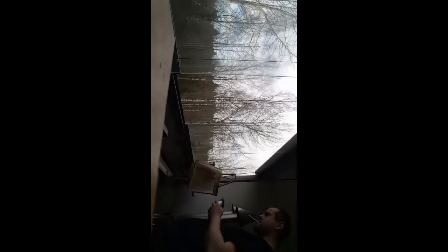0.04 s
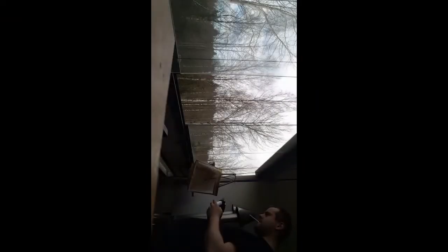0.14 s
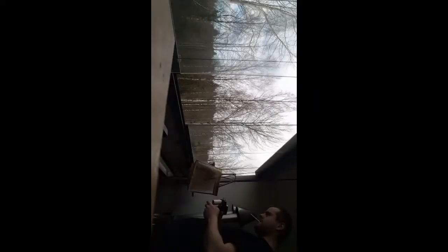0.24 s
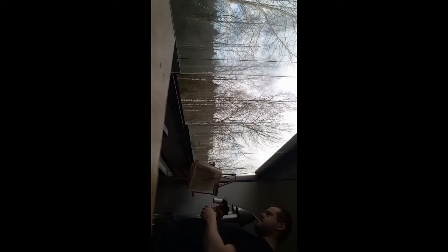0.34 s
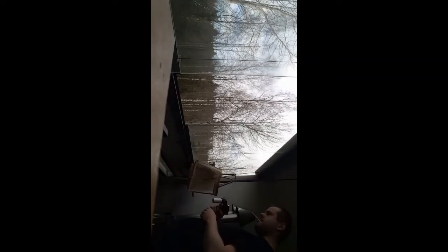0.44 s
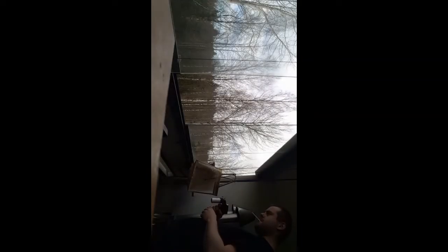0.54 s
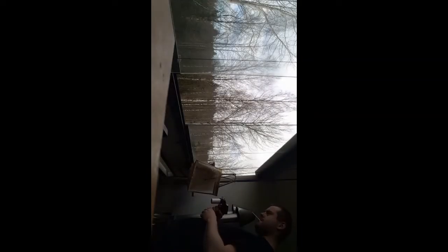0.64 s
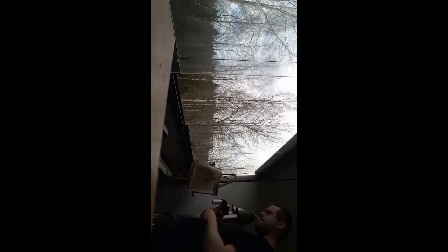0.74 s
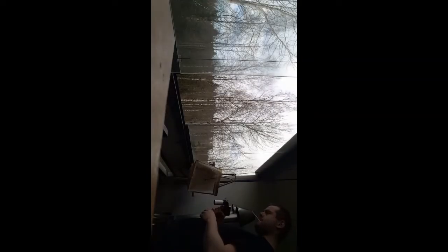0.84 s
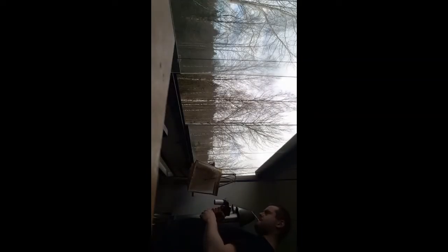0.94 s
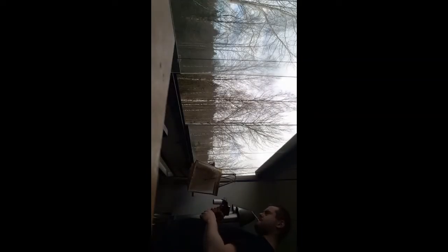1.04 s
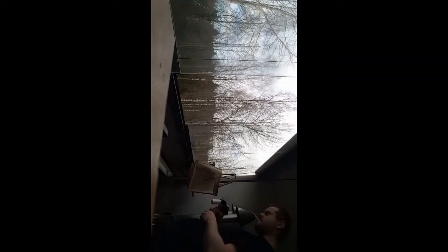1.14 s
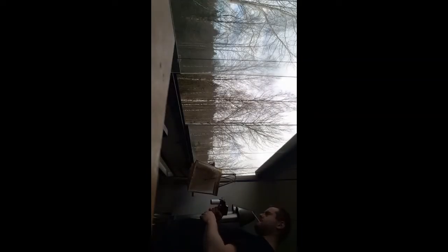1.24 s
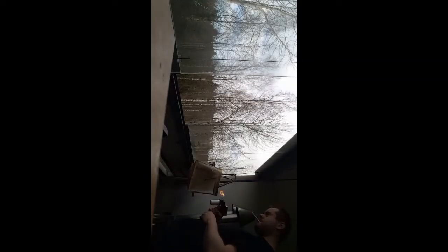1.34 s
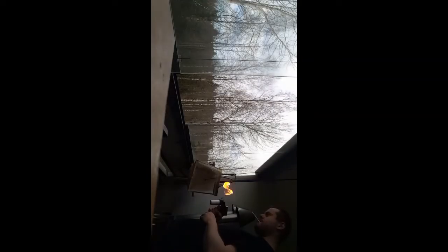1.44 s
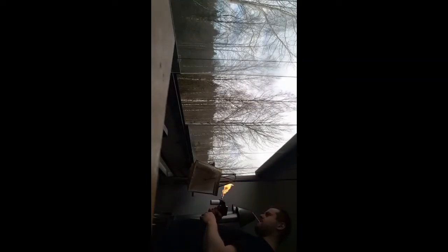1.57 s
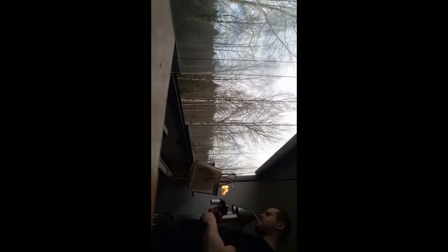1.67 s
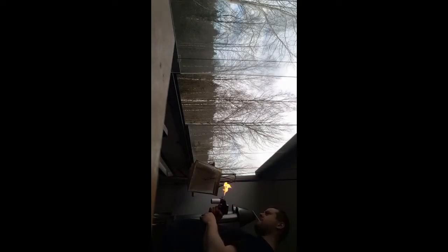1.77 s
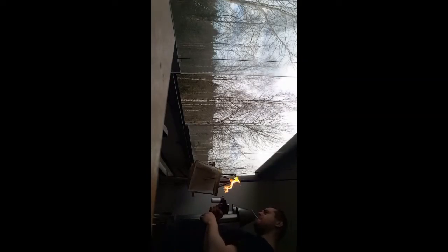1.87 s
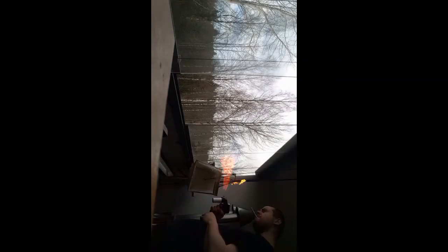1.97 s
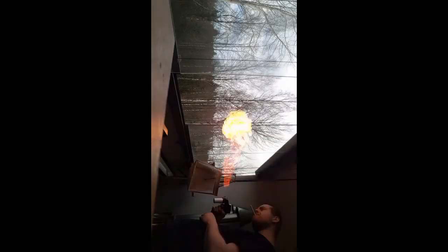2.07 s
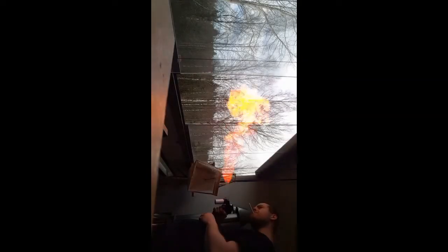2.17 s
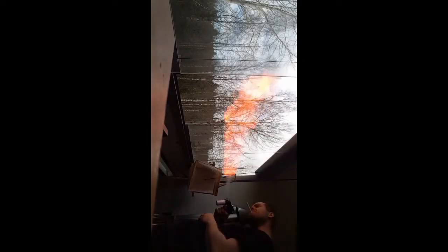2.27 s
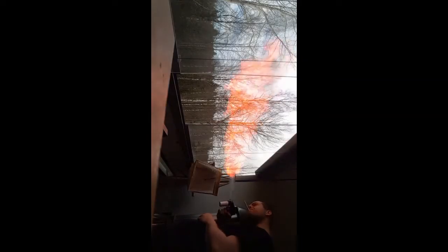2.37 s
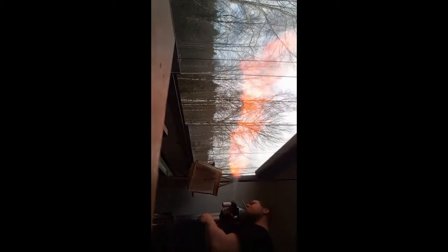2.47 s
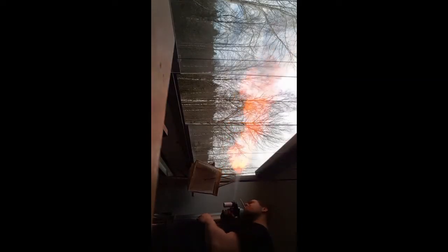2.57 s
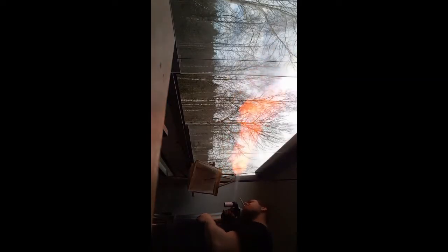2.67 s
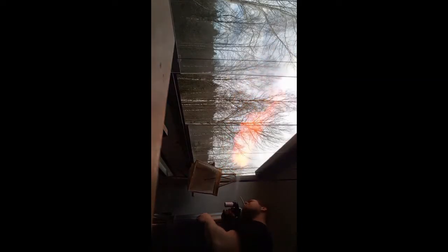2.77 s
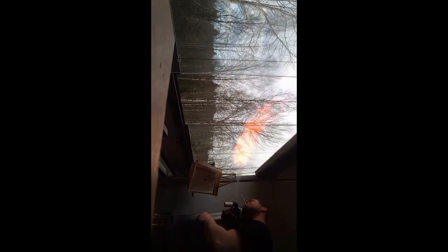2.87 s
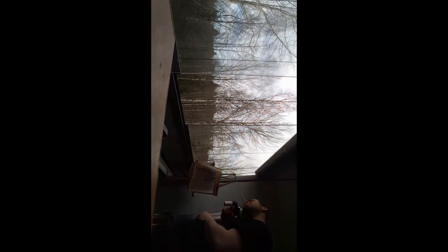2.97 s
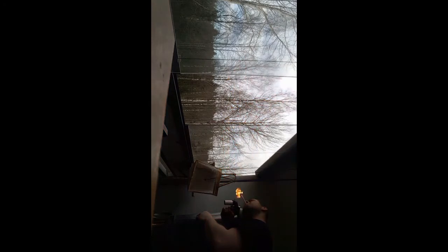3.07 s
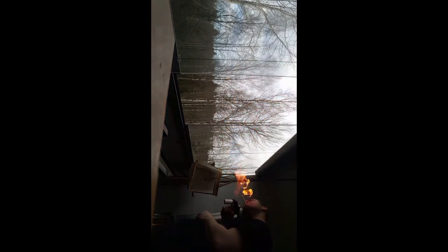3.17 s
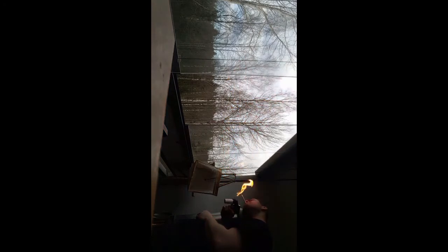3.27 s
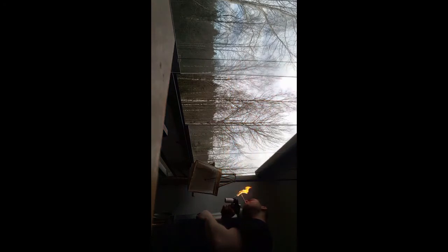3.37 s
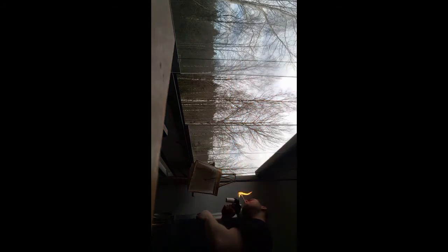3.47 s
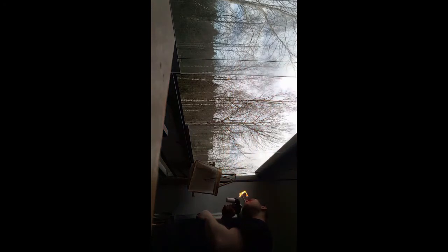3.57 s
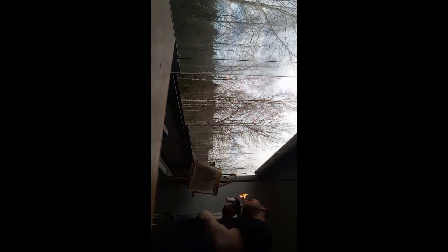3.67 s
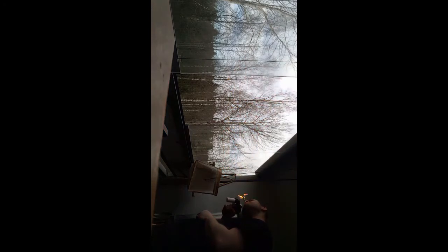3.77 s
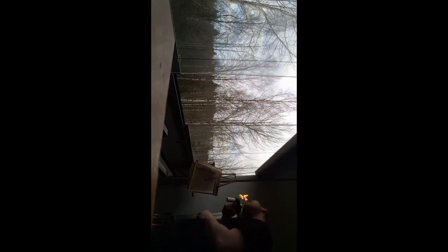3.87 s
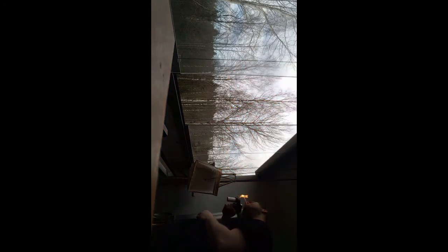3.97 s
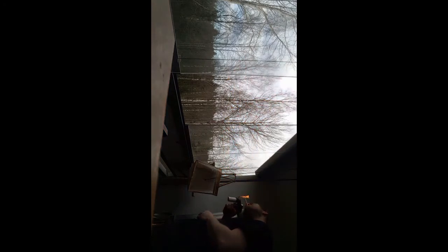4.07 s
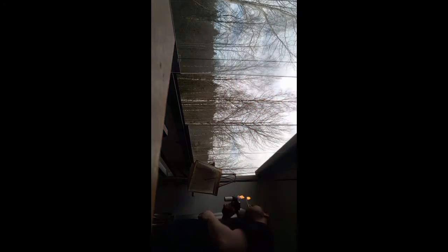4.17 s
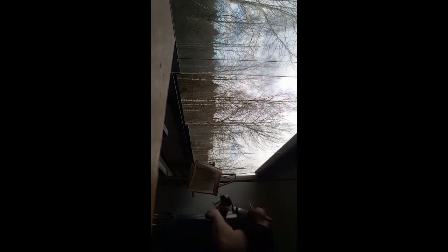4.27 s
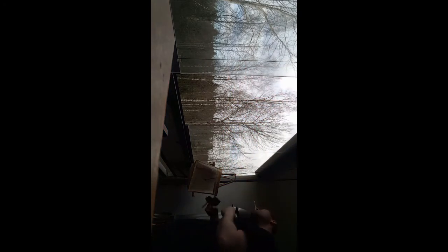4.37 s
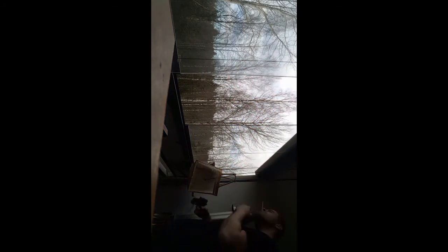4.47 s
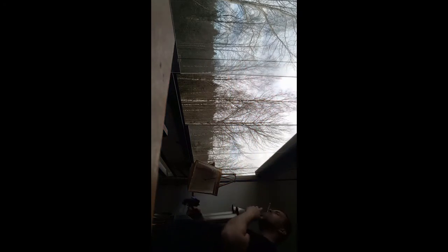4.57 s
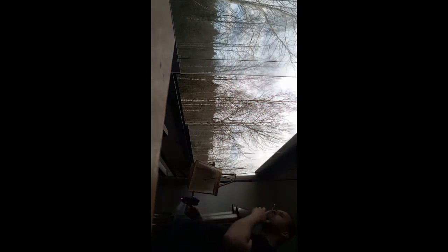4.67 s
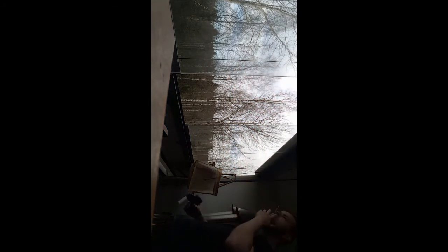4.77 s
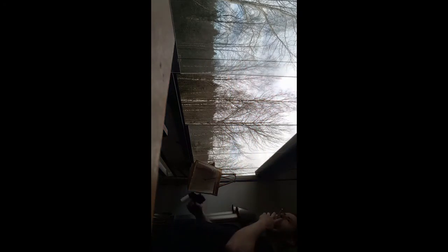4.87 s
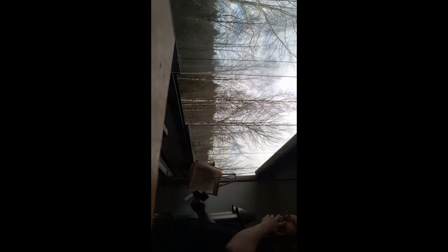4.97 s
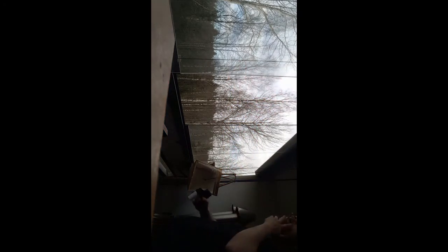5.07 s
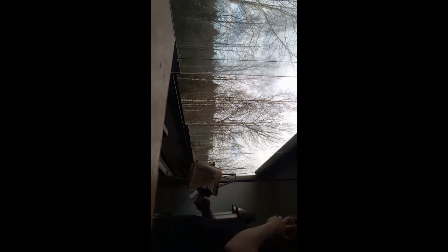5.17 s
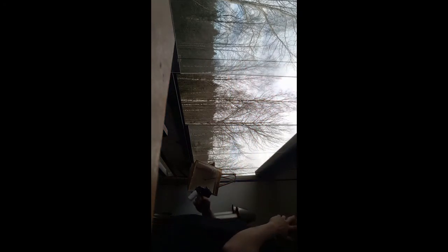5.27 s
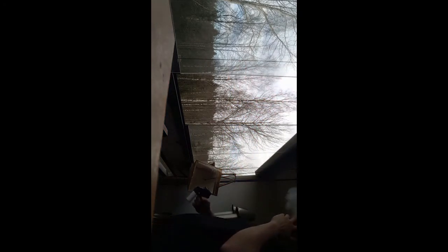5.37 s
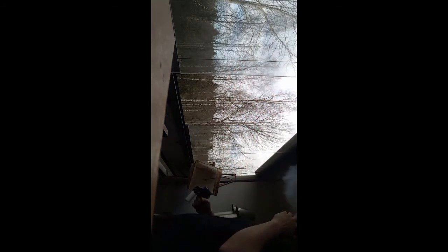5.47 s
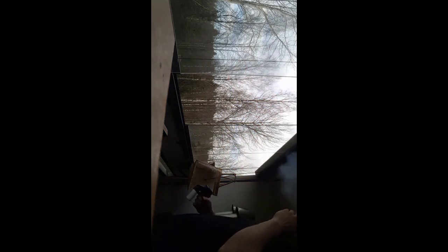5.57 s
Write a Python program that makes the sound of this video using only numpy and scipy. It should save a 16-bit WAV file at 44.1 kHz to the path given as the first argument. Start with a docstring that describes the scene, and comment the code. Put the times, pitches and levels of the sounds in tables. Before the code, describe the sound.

Close, overloading machine-gun pops of gas echo off a porch, followed by a crackling fireball roar, a late dry crack and a last hiss.

```python
"""Homemade gas torch on a covered porch

Close to the microphone, a torch sputters in a train of sharp pops: each is a short blast wave plus a puff of hissing
noise. It idles on a thin hiss, then sputters again and throws a fireball: roaring noise, booming billows, crackle.
A late flare-up, a dry crack and a last spurt of gas follow. Walls and roof echo the pops and colour the fire.
Faint rustles of clothing lie under it, and far tyres, as filtered noise, behind it all."""
import sys
import numpy as np
from scipy import signal
from scipy.fft import rfft, irfft
from scipy.io import wavfile
from scipy.ndimage import uniform_filter1d

SR = 44100
rng = np.random.default_rng(int(sys.argv[2]) if len(sys.argv) > 2 else 0)


def unload_audio(sound):
    """Save the sound as a 16-bit wav file, at the path given as the first command line argument."""
    columns = np.transpose(np.atleast_2d(sound))
    # keep every value between -1 and 1, then stretch to whole-number steps
    steps = np.round(np.clip(columns, -1, 1) * 32767)
    wavfile.write(sys.argv[1], SR, steps.astype(np.int16))


N = 247842
TIME = np.arange(N) / SR  # s
FREQS = np.maximum(np.fft.rfftfreq(N, 1 / SR), 1)  # Hz

# ignition pops: t/s, relative blast level/dB, burning builds/ms, burning stops/ms, treble snap level/dB
IGNITIONS = [(0.6224, 6.5, 2.85, 0.26, -11.5), (0.6656, 3.5, 2.78, 0.28, -9),
             (0.7069, 5.5, 0.71, 0.21, -13), (0.7511, 2, 2.16, 0.26, -8), (0.7961, -2, 3.0, 0.13, -10),
             (0.834, 3, 1.6, 0.19, -12.5), (0.8733, -8, 0.64, 0.26, -11.5), (0.9121, -5.5, 1, 0.24, -12),
             (0.9508, -7, 0.62, 0.23, -12), (0.9901, 0.5, 0.88, 0.23, -12.5),
             (1.0313, 1.5, 1.2, 0.17, -12.5), (1.0716, -1.5, 1.15, 0.37, -12),
             (1.1143, 0.0, 0.95, 0.15, -13.5), (1.1551, 3, 2.1, 0.2, -14.5), (1.195, 0, 0.58, 0.16, -10.5),
             (1.232, 0.5, 0.96, 0.24, -13), (1.2682, -4.5, 0.9, 0.4, -11.5), (1.3071, 1.0, 0.82, 0.16, -14),
             (1.3442, -1.5, 1.4, 0.29, -12.5), (1.3779, 1.5, 1, 0.19, -19), (1.4135, 2, 1.1, 0.3, -14),
             (1.4451, -7.5, 0.68, 0.34, -14.5), (1.4744, -2, 1.1, 0.32, -14.5),
             (2.1091, -10, 0.27, 0.2, -13.5), (2.1494, -5, 2.8, 0.41, -16),
             (2.1943, -5.5, 0.73, 0.44, -10.5), (2.2443, 1, 0.43, 0.13, -17), (2.292, 2, 0.49, 0.23, -13),
             (2.35, 1.5, 0.59, 0.23, -10.5), (2.4025, 6, 0.46, 0.17, -14.5), (2.4557, 1.5, 0.52, 0.22, -13),
             (2.5118, -1.5, 1.52, 0.29, -8), (2.5744, 6, 0.53, 0.15, -10.5), (2.6454, -3.5, 2, 0.06, -13),
             (2.7062, -2, 1.2, 0.25, -14), (2.7645, -10, 0.3, 0.12, -12), (2.8162, -7, 0.26, 0.22, -16),
             (2.8747, -1, 1.3, 0.25, -12), (2.9394, -7.5, 0.25, 0.12, -12.5),
             (2.9958, -1.5, 1, 0.21, -11.5), (3.0525, -6.5, 0.93, 0.15, -11), (3.0877, -1, 0.44, 0.25, -13),
             (3.1238, -10, 2.17, 0.087, -12.5), (3.1568, -2.5, 0.49, 0.12, -13.5),
             (3.187, -3, 0.4, 0.12, -16), (3.2974, -12, 2.56, 0.079, -26), (3.3349, 1.0, 5.8, 0.12, -15.5),
             (3.3675, -11, 0.31, 0.18, -13), (3.7572, -16, 0.41, 0.063, -24),
             (4.1348, -11, 0.32, 0.07, -28), (4.2268, -20, 1.75, 0.11, -24.5)]


def undb(db):
    """Decibels to gain."""
    return 10 ** (np.asarray(db) / 20)


def unit(x):
    """Scale to rms 1."""
    return x / np.sqrt(np.mean(x ** 2))


def curve(rows):
    """Gain over time from rows of t/s, level/dB."""
    return undb(np.interp(TIME, *np.transpose(rows)))


def across(rows, column=1):
    """One column of a table that starts with f/Hz, spread over log frequency."""
    table = np.array(rows)
    return np.interp(np.log(FREQS), np.log(table[:, 0]), table[:, column])


def walk(rate_hz):
    """Smooth random wander about 0, with a spread near 1 and a new target rate_hz times a second."""
    step = max(int(SR / rate_hz), 2)
    targets = np.repeat(rng.standard_normal(N // step + 1), step)
    smooth = uniform_filter1d(uniform_filter1d(targets, step), step)
    return 1.39 * smooth[:N]  # makes up for the spread lost in smoothing


def diffuse(colour_db):
    """Coloured stereo noise from all around; the likeness of left and right depends on frequency."""
    # likeness of the two microphone ports: f/Hz, correlation
    likeness = [(60, 0.95), (180, 0.87), (380, 0.37), (700, 0.85), (1300, -0.56), (3000, 0.13)]
    alike = across(likeness)
    mid, side = rfft(rng.standard_normal((2, N)))
    mid, side = mid * np.sqrt(1 + alike), side * np.sqrt(1 - alike)
    return unit(irfft(np.array([mid + side, mid - side]) * undb(colour_db), N))


def porch(x, wet_db, t60):
    """Add the short, dense echo of walls and roof: noise that falls by 60 dB in t60 seconds."""
    t = TIME[:SR // 3]
    tail = rng.standard_normal((2, len(t))) * undb(-60 * t / t60) * (t > .002)
    tail /= np.sqrt(np.sum(tail ** 2, axis=1, keepdims=True))
    return x + undb(wet_db) * signal.fftconvolve(x, tail, axes=1)[:, :N]


def pops():
    """Every ignition blast, echoed by the porch."""
    return porch(blasts(), wet_db=-13, t60=0.05)


def blasts(low_hz=60, scatter_db=1.6, lag_s=0.001435, lag_spread=.1, wall_s=.0051, wall_share=0.14):
    """Burning builds up and stops short; its rate of change is the blast wave. A close reflection colours it."""
    # shares at the (left, right) microphone port, straight and by the close reflection
    direct, reflected = (0.32, 0.99), (-0.87, 0.087)
    t = np.arange(-SR // 100, SR // 100) / SR
    out = np.zeros((2, N))
    chances = rng.standard_normal((len(IGNITIONS), 5))
    for (s, db, build_ms, stop_ms, _), chance in zip(IGNITIONS, chances):
        build, stop = build_ms / 1000, stop_ms / 1000
        length = np.where(t < 0, build, stop)
        blast = t * stop / length ** 2 * np.exp(-(t / length) ** 2)
        # each pocket of gas burns in a slightly different place, which shifts its reflections
        close_lag = lag_s * np.exp(lag_spread * chance[2])
        wall_lag = wall_s * np.exp(lag_spread * chance[3])
        close = np.interp(t - close_lag, t, blast)
        wall = wall_share * (1 + .5 * chance[4]) * np.interp(t - wall_lag, t, blast)
        wave = np.outer(direct, blast + wall) + np.outer(reflected, close)
        start = int((s + t[0]) * SR)
        gain = undb(db + scatter_db * chance[:2])[:, None]  # scatters at each port
        out[:, start:start + len(t)] += gain * wave
    return signal.sosfilt(signal.butter(1, low_hz, "high", fs=SR, output="sos"), out)


def late_crack(s=3.3345, level_db=-15, decay_s=0.0018, low_hz=650, top_hz=2900, left_db=-4):
    """A dry crack at one of the last pops: band-passed noise that starts at once and dies away."""
    band = signal.butter(2, [low_hz, top_hz], "band", fs=SR, output="sos")
    crack = unit(signal.sosfilt(band, rng.standard_normal((2, N))))
    fade = np.exp(-np.abs(TIME - s) / decay_s) * (TIME > s)
    return crack * undb([[level_db + left_db], [level_db]]) * fade


def gas(flutter_db=1.0, dull_hz=3500, weak_db=-47):
    """The jet hisses with the force of the puffs and of the flow between them."""
    # colour of the jet at each microphone port: f/Hz, left level/dB, right level/dB
    jet_colour = [(59.8, -6.5, -30), (200, -16.5, -15.5), (597, -4.5, -9.5), (1100, -5, -3.5),
                  (1550, -3, -4.5), (2500, -1, -2.5), (3560, -4.5, -4), (4400, -2, -1), (7760, 0, -1.5),
                  (9300, 3, -10), (10360, -0.5, -6), (13500, 5, 1), (15800, -12, -10.5), (14800, 2, -7.5)]
    jet = diffuse(np.array([across(jet_colour, column=1), across(jet_colour, column=2)]))
    # reflections comb the hiss with fine, steady ripples
    jet = unit(porch(jet, wet_db=-1.5, t60=0.071))
    force = np.hypot(puffs(), flow())
    # a dying jet is slow and loses its top first
    dull = signal.sosfilt(signal.butter(1, dull_hz, fs=SR, output="sos"), jet)
    jet = dull + (jet - dull) * force / np.hypot(force, undb(weak_db))
    return jet * force * undb(flutter_db * walk(220))


def drain(age, hold_s=0.017, fall_db_per_s=222.5):
    """Gain of a jet some seconds after its supply is cut: a short hold, then a steady fall."""
    return undb(-fall_db_per_s * (np.hypot(np.maximum(age, 0), hold_s) - hold_s))


def puffs(snap_s=0.00073, snap_lead_s=0.00044, surge_s=0.0048):
    """Force of the jet at the pops: it snaps, surges, and sags as its pressure drains; walls repeat the snap."""
    # gas pressure behind the pops, as the level of the puff that each lets out: t/s, level/dB
    pressure = [(.62, -16), (1.0, -20.5), (1.48, -20), (2.1, -24), (2.15, -17.5), (2.6, -17), (3.19, -20),
                (3.29, -38.5), (3.332, -22), (3.37, -24.5), (3.75, -36), (4.14, -28), (4.23, -31.5)]
    # echoes of the snap from walls and roof: delay/s, level/dB
    walls = [(.0012, 3), (.0046, -7), (.0054, -12.5), (0.0127, -11.5), (.0186, -9.5)]
    s, *_, snap_db = np.transpose(IGNITIONS)
    s = s - snap_lead_s  # the snap comes just ahead of the blast
    size = undb(np.interp(s, *np.transpose(pressure)))
    count = np.searchsorted(s, TIME, side="right")  # pops so far
    started = count > 0
    last = np.maximum(count - 1, 0)
    age = np.abs(TIME - s[last])
    snap = undb(snap_db[last]) * np.exp(-age / snap_s) * started
    echo_power = sum((undb(db) * np.interp(TIME - delay, TIME, snap)) ** 2 for delay, db in walls)
    surge = size[last] * (1 - np.exp(-age / surge_s)) * drain(age) * started
    return np.sqrt(snap ** 2 + echo_power + surge ** 2)


def flow(open_s=0.046, swell_db=7.5, swell_s=0.089):
    """Force of the jet between the pops: a thin idling flow that swells and cuts off, and single spurts."""
    # the small flame idles: opens/s, closes/s, level before the swell/dB
    idles = [(1.579, 2.071, -36), (3.528, 4.072, -35.5)]
    # smooth spurts of gas: peak t/s, level/dB, rise/s
    spurts = [(3.48, -37.5, 0.066), (4.205, -42.5, .04), (4.353, -20, 0.042)]
    out = np.zeros(N)
    for opens, closes, db in idles:
        # the flow swells as the valve is squeezed, just before it cuts off
        squeeze_db = swell_db * np.exp(np.minimum(TIME - closes, 0) / swell_s)
        opening = np.clip((TIME - opens) / open_s, 0, 1)
        out += opening * undb(db + squeeze_db) * drain(TIME - closes)
    for s, db, rise in spurts:
        out += undb(db) * np.exp(-(np.minimum(TIME - s, 0) / rise) ** 2) * drain(TIME - s)
    return out


def fireball(flicker_db=1, tearing_db=2.5, throb_db=6.5, rumble_under_roar_db=-7):
    """Turbulent burning tears and roars above a throbbing rumble; both ring the porch."""
    # colour of the roar: f/Hz, level/dB
    roar_colour = [(100, -24), (200, 2), (280, 0.5), (400, -1.5), (560, 3), (700, -2.5), (1100, 1),
                   (1400, -20.5), (2500, -12), (4000, -34)]
    # colour of the rumble: f/Hz, level/dB
    rumble_colour = [(20, -20.5), (45, -20.5), (70, -5), (95, -5.5), (120, -10.5), (150, 0), (195, -2.5),
                     (260, -20.5), (500, -24.5), (1500, -96.5)]
    # resonances of the porch: f/Hz, width/Hz, level/dB
    modes = [(96, 12, 9.5), (157.3, 14, 8), (417, 18, 12.5), (555, 22, 7.5), (624, 8.1, 7), (746, 46, 8)]
    ring_db = sum(db / (1 + (2 * (FREQS - hz) / width) ** 2) for hz, width, db in modes)
    roar_swing_db = flicker_db * walk(45) + tearing_db * walk(250)
    roar = unit(diffuse(across(roar_colour) + ring_db) * undb(roar_swing_db))
    rumble = unit(diffuse(across(rumble_colour) + ring_db) * undb(throb_db * walk(25)))
    return burning() * (roar + rumble * undb(rumble_under_roar_db))


def burning(grow_s=0.1, sag_db_per_s=4.5, die_db_per_s=171):
    """Strength of the fire: each flame grows, sags slowly while it is fed, then dies away."""
    # the fireball, its dying tail and one small flare-up: catches/s, starts to die/s, roar level/dB
    flames = [(2.064, 3.077, -23), (3.12, 3.16, -39), (3.286, 3.31, -29)]
    out = np.zeros(N)
    for catches, dies, db in flames:
        age = np.maximum(TIME - catches, 0)
        fall_db = sag_db_per_s * age + die_db_per_s * np.maximum(TIME - dies, 0)
        out += (1 - np.exp(-age / grow_s)) * undb(db - fall_db)
    return out


def billows(waver=0.0705, rough_db=1.5, right_db=-2, port_turns=0.11):
    """Each roll of the plume booms for a few unsteady cycles; the porch puts the two ports out of step."""
    # deep billows of the fireball: t/s, half length/s, f/Hz, level/dB
    rolls = [(2.114, 0.012, 73.5, -25.5), (2.18, 0.03, 148, -26), (2.525, 0.053, 161.8, -20.5),
             (2.62, .04, 96, -29), (2.678, 0.03, 93, -24), (2.675, 0.029, 158, -20.5),
             (2.74, .02, 150.4, -26), (2.862, 0.045, 147.8, -26.5), (2.956, 0.024, 156, -24),
             (3.045, 0.048, 155.9, -26.5), (3.043, 0.041, 68, -28)]
    clock = np.cumsum(1 + waver * walk(90)) / SR  # uneven time makes the pitch waver
    port = np.array([[0], [port_turns]])  # the right port lags by part of a cycle
    booms = np.zeros((2, N))
    for (s, length, hz, db), turn in zip(rolls, rng.random(len(rolls))):
        swell = undb(db) * np.exp(-((TIME - s) / length) ** 2)
        booms += swell * np.sin(2 * np.pi * (hz * clock + turn - port))
    return undb([[0], [right_db]]) * booms * undb(rough_db * walk(150))


def crackle(per_s=90, spread_db=4, grain_s=0.0007, dull_hz=2500, under_roar_db=-11):
    """Small pockets of gas pop at random inside the plume, each a short grain of noise."""
    sizes = undb(spread_db * np.minimum(rng.exponential(size=N), 3))  # a few are much louder
    ticks = (rng.random(N) < per_s / SR) * sizes
    t = TIME[:SR // 200]
    grain = rng.standard_normal((2, len(t))) * np.exp(-t / grain_s)
    grain = signal.sosfilt(signal.butter(1, [400, dull_hz], "band", fs=SR, output="sos"), grain)
    train = signal.fftconvolve(ticks[None], grain, axes=1)[:, :N]
    return unit(train) * undb(under_roar_db) * burning()


def rustle():
    """Clothing brushes softly as the torch is handled: swells of band-passed noise."""
    # faint rustles of movement: t/s, half length/s, level/dB
    rustles = [(.54, 0.025, -70), (4.88, 0.086, -65), (5.142, 0.035, -60.5)]
    band = signal.butter(1, [2500, 9000], "band", fs=SR, output="sos")
    brush = unit(signal.sosfilt(band, rng.standard_normal((2, N))))
    return brush * sum(undb(db) * np.exp(-((TIME - s) / length) ** 2) for s, length, db in rustles)


def road(waver_db=1.16, direct_db=-3, direct_hz=950, lag_s=0.000422):
    """Far tyres rush softly, strongest near one kilohertz; a direct upper part reaches the left port first."""
    # level of the road rush as the recorder's automatic gain ducks and recovers: t/s, level/dB
    rush_level = [(0, -51.5), (.22, -52.5), (.55, -43), (.75, -48), (3.75, -48.5), (4.1, -38.5),
                  (4.5, -36.5), (5.62, -36.5)]
    # colour of the distant road: f/Hz, level/dB
    road_colour = [(25, -17), (60, -0.5), (110, -4), (180, 1), (290, -7.5), (520, -1), (760, -2), (1050, 8),
                   (1220, 2), (1400, -11.5), (2100, -14), (3300, -27.5), (5000, -36), (14000, -49)]
    rush = diffuse(across(road_colour))
    high_pass = 1 / np.sqrt(1 + (direct_hz / FREQS) ** 8)
    left = rfft(diffuse(across(road_colour))[0]) * undb(direct_db) * high_pass
    right = left * np.exp(-2j * np.pi * FREQS * lag_s)  # the same sound, later
    direct = irfft(np.array([left, right]), N)
    return unit(rush + direct) * curve(rush_level) * undb(waver_db * walk(14))


def scene():
    """Torch and surroundings, from the pops to the distant road."""
    torch = pops() + late_crack() + gas()
    fire = fireball() + billows() + crackle()
    return torch + fire + rustle() + road()


def record(dry, top_hz=14600):
    """The sharpest pops overload the microphone and are clipped; the top is cut steeply."""
    low_pass = signal.ellip(10, .2, 70, top_hz, fs=SR, output="sos")
    return signal.sosfilt(low_pass, np.clip(dry, -1, 1))


dry = scene()
out = record(dry)
unload_audio(out)
```